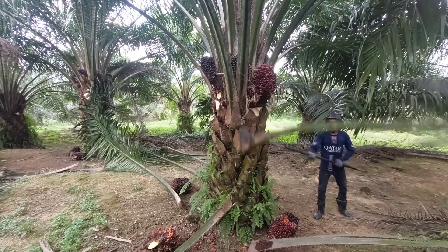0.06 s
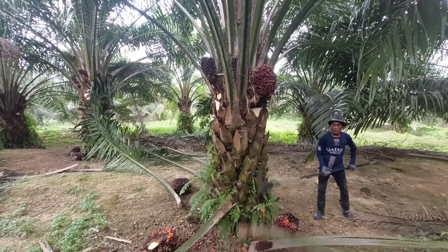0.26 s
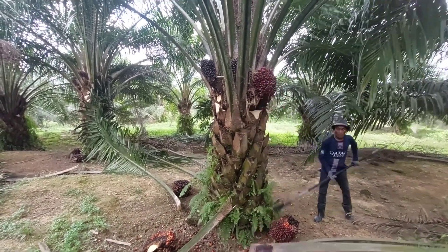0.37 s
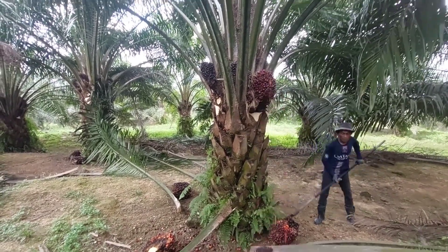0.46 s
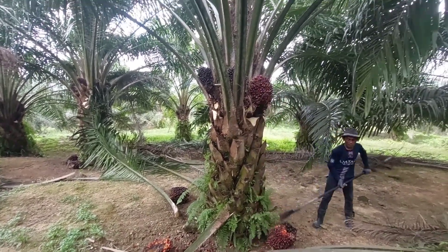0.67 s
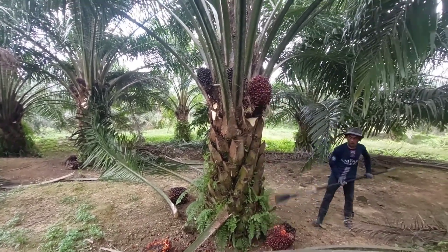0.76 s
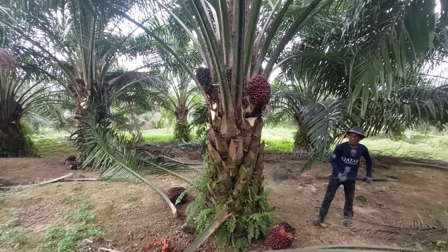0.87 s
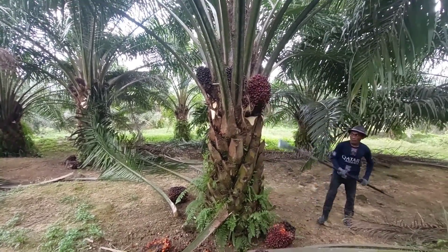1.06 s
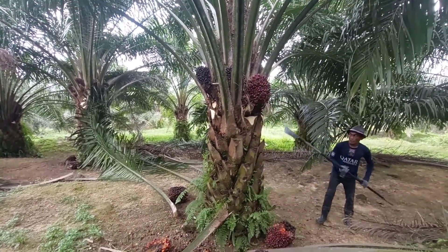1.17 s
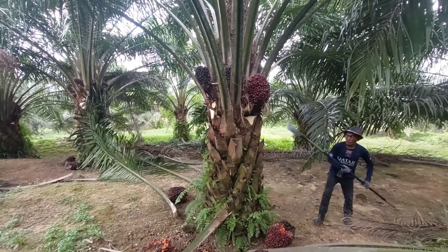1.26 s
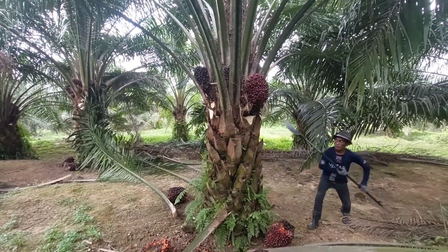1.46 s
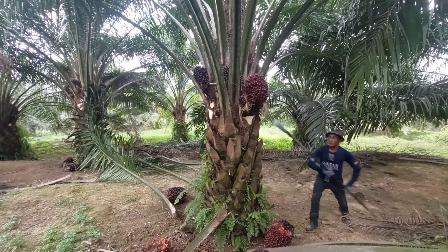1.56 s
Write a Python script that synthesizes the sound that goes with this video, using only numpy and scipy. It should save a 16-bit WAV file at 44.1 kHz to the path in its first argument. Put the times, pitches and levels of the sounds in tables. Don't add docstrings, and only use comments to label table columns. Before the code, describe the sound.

A cut palm frond falls and crashes in a plantation. Leaflets swish from the start, woody knocks and a faint steel ring come at 0.23 s, then a loud, crackly impact at 0.37-0.45 s with soil scraping. Dry stalk bounces follow at 0.64-0.75 s, then tiny rustles and ticks fade, with a soft low knock near 1.57 s. A far engine hums low beneath faint air and insect hiss.

```python
import sys
import numpy as np
from scipy import signal
from scipy.fft import rfft, irfft, next_fast_len
from scipy.io import wavfile
from scipy.ndimage import map_coordinates

SR = 44100
rng = np.random.default_rng(int(sys.argv[2]) if len(sys.argv) > 2 else 0)


def transcribe(signal):
    frames = np.atleast_2d(signal).T
    limited = np.clip(frames, -1, 1)
    pcm = np.round(limited * 32767).astype(np.int16)
    wavfile.write(sys.argv[1], SR, pcm)


def gain_from_db(level_db):
    decades = np.asarray(level_db, float) / 20
    return 10 ** decades


N = 70560

# (time [s], level [dB])
RUSTLE_LEVEL = [(0, -41), (.098, -41), (.142, -46), (.3, -45), (.313, -37.5), (.36, -35.5), (.385, -26.5),
                (.393, -21), (.45, -29.5), (.508, -38), (.528, -35), (.57, -44), (.78, -53), (.94, -56),
                (.97, -59), (1.13, -62.5), (1.27, -66.5), (1.6, -70)]
# (frequency [Hz], likeness, clipped to 0 to 1)
FROND_ALIKE = [(60, 0.1), (240, -2.2), (950, 0.74), (3770, -0.12), (15000, 0.029)]
# (frequency [Hz], likeness [0 to 1])
FAR_ALIKE = [(60, 0.75), (380, 0.54), (2380, 0.16), (15000, 0.04)]
FROND_LEAD_S = 0.00019


def unit(x):
    return x / np.sqrt(np.mean(x ** 2) + 1e-20)


def along(points, hz):
    f, v = np.transpose(points)
    return np.interp(np.log(hz + 1), np.log(f + 1), v)


def closed(points):
    return [(points[0][0] / 2, -120), *points, (points[-1][0] * 2, -120)]


def curve(rows):
    return np.interp(np.arange(N) / SR, *np.transpose(rows))


def wobble(rate):
    knots = rng.standard_normal(int(N * rate / SR) + 4)
    return map_coordinates(knots, [np.arange(N) * rate / SR])


def filtered(x, response):
    m = next_fast_len(x.shape[-1] + SR // 4)
    return irfft(rfft(x, m) * response(np.fft.rfftfreq(m, 1 / SR)), m)[..., :x.shape[-1]]


def spread(pair, spectrum, alike, lead_s=0):
    # (frequency [Hz], level difference [dB])
    left_lean = [(60, 27.5), (380, 1.5), (2380, 5.5), (15000, 5.5)]

    def sides(hz):
        lean = gain_from_db(along(left_lean, hz) * np.c_[[.5, -.5]])
        return lean * np.exp(1j * np.pi * hz * lead_s * np.c_[[1, -1]])

    def shared_and_opposite(hz):
        angle = np.arccos(np.clip(along(alike, hz), 0, 1)) / 2
        return gain_from_db(along(closed(spectrum), hz)) * [np.cos(angle), np.sin(angle)]

    a, b = filtered(pair, shared_and_opposite)
    return filtered(np.array([a + b, a - b]), sides)


def engine():
    # (time [s], level [dB])
    engine_level = [(0.0, -41.5), (0.254, -39.5), (0.726, -49.5), (1.256, -51), (1.6, -49)]
    # (frequency [Hz], width [Hz], level [dB])
    pipe_modes = [(58, 15.6, 0), (138, 35, 2.5), (193, 76, -5.5), (290, 63, -24.5)]
    # (frequency [Hz], density [dB per Hz])
    rasp_color = [(500, -40), (750, -22), (950, -21), (1150, -27.5), (1500, -63)]
    # (frequency [Hz], density [dB per Hz])
    rumble_color = [(13, -36), (22, -32), (49, 3.5), (120, -6.5), (160, -23), (260, -120)]
    firing_hz, jitter, pulse_spread_db = 65, .07, 2.5
    rumble_db, rasp_db = -1.5, -14

    def pipe(f):
        total = 0
        for k, (center, width, db) in enumerate(pipe_modes):
            mode = 1j * f * width / (center * center - f * f + 1j * f * width)
            total = total + (-1) ** k * gain_from_db(db) * mode
        return total / (1 + (f / 450) ** 4)

    phase = np.cumsum(firing_hz * (1 + jitter * wobble(20))) / SR
    firing = np.diff(np.floor(phase), prepend=0) > 0
    hum = unit(filtered(firing * gain_from_db(pulse_spread_db * wobble(60.6)), pipe))
    gate = 1 + .5 * np.cos(2 * np.pi * phase)
    rasp = unit(spread(gate * rng.standard_normal((2, N)), rasp_color, FAR_ALIKE))
    low = filtered(rng.standard_normal(N), lambda f: gain_from_db(along(closed(rumble_color), f)))
    rumble = unit(gain_from_db(wobble(8.0)) * low)
    level_db = curve(engine_level)
    hum_db = (level_db + 2 * level_db[-1]) / 3 - 1.0
    return gain_from_db(hum_db) * hum + gain_from_db(level_db + rumble_db) * rumble + gain_from_db(level_db[-1] + rasp_db) * rasp


def grove_floor():
    # (frequency [Hz], density [dB per Hz])
    air_color = [(180, -38), (300, 6.5), (553, -17), (971, 3.5), (1370, -6.5), (5790, -20.5), (6840, -44),
                 (15600, -31)]
    # (frequency [Hz], density [dB per Hz])
    insect_color = [(6000, -37), (6600, -7), (7100, 0), (7500, -5), (8100, -30)]
    air_db, insect_db, fade_db_per_s = -60.5, -69, -10.5
    air = unit(spread(rng.standard_normal((2, N)), air_color, FAR_ALIKE))
    insects = unit(spread(rng.standard_normal((2, N)), insect_color, FAR_ALIKE))
    fade_db = fade_db_per_s * (np.arange(N) / SR - 1.65)
    return gain_from_db(air_db) * air + gain_from_db(insect_db + fade_db + 1.7 * wobble(30.6)) * insects


def frond():
    # (frequency [Hz], density [dB per Hz])
    leaf_color = [(120, -3), (250, 1.5), (1380, -4.5), (1880, -2), (2060, 0), (2390, -2), (9550, -7.5),
                  (12100, -7), (15600, -1.5)]
    grain_db, grain_spread_db, grain_s, flutter_db = -5, 4, .0012, .6
    sizes = gain_from_db(grain_spread_db * wobble(1 / grain_s))
    rub, tick = rng.standard_normal((2, 2, N))
    grainy = rub + gain_from_db(grain_db) * unit(sizes * tick)
    rustle = unit(spread(grainy, leaf_color, FROND_ALIKE, FROND_LEAD_S))
    flutter = flutter_db * (wobble(25.4) + wobble(69.9))
    return gain_from_db(curve(RUSTLE_LEVEL) + 5.5 + flutter) * rustle


def slaps():
    # (time [s], level [dB rms], center [Hz], 60 dB decay [s], width [octaves])
    slap_list = [(.09, -50, 9000, .05, .5), (.157, -38, 2470, 0.14, 0.76), (.367, -20, 9000, 0.026, .5),
                 (.319, -37, 2380, 0.033, 0.58), (.373, -36, 5200, .02, .3),
                 (0.3729, -33, 1700, 0.041, 0.68), (.387, -17, 5550, 0.018, 1),
                 (0.3924, -6, 6460, 0.0099, 0.95), (.3985, -21, 5100, 0.028, 0.19),
                 (.401, -21, 2500, .03, .5), (.431, -26, 1900, .03, .4), (.442, -18.5, 4700, .014, .4),
                 (.448, -29, 5000, .04, .3), (.522, -43, 6000, 0.13, .6), (.645, -39.5, 3160, 0.062, 0.54),
                 (0.7003, -36, 4070, .018, 0.3), (.799, -44, 4800, 0.024, 0.17),
                 (.806, -40, 11500, .016, .5), (.841, -38, 9000, .025, 1.1), (.845, -45, 11500, .11, .5),
                 (.848, -48, 5500, .09, .5), (1.02, -55, 9000, .04, .8), (1.045, -54, 10000, .16, .6),
                 (1.056, -47, 2000, .02, 1.3), (1.095, -56, 4600, .16, .25), (1.248, -62, 12000, .02, .6),
                 (1.325, -60, 11000, 0.055, 0.45), (1.38, -60, 11500, .05, .5), (1.43, -61, 12200, .05, .5)]
    out, t = np.zeros((2, N + SR)), np.arange(SR // 5) / SR
    for s, db, hz, t60, octaves in slap_list:
        band = [(hz / 2 ** (3 * octaves), -30), (hz / 2 ** octaves, -6), (hz, 0),
                (hz * 2 ** octaves, -6), (hz * 2 ** (2 * octaves), -20)]
        puff = unit(spread(rng.standard_normal((2, len(t))), band, FROND_ALIKE, FROND_LEAD_S))
        onset = 1 - np.exp(-t / 0.00023)
        out[:, round(s * SR):][:, :len(t)] += gain_from_db(db - 60 * t / t60) * onset * puff
    return out[:, :N]


def knocks():
    # (time [s], peak [dB], pitch [Hz], 60 dB
    # decay [s], left over right [dB])
    stalk_knocks = [(0.158, -38, 357, 0.071, 1), (0.16, -36, 268, 0.061, 8), (0.225, -26, 1810, 0.036, 6),
                    (.2275, -29, 2440, 0.024, 5), (0.228, -27, 1132, 0.026, -3),
                    (0.2305, -26, 1440, 0.019, 7.5), (.2305, -22, 560, 0.025, 2),
                    (0.2309, -20.5, 388, 0.04, -4), (.236, -30.5, 329, 0.075, -1),
                    (0.3728, -22, 1200, 0.045, 3), (.373, -25.5, 297, 0.044, 0),
                    (0.388, -10.5, 1547, 0.024, 3.5), (.391, -17.5, 961, 0.031, 0),
                    (.402, -25, 818, 0.047, 2), (.3718, -13.5, 2200, .026, 1), (.3903, -9, 430, .055, 3),
                    (.3922, -16.5, 298, .08, -3), (.394, -16, 205, .04, 0), (0.413, -22.5, 294, 0.036, 14),
                    (.415, -24, 453, 0.028, 3), (.426, -28.5, 514, .03, 0), (.441, -25.5, 335, 0.027, -3),
                    (0.529, -31, 1470, 0.02, 13.5), (.538, -44, 2190, 0.028, 8.5),
                    (.642, -23.5, 1052, 0.027, 0), (.6455, -25.5, 1153, 0.02, 8.5),
                     (0.675, -36, 1390, 0.027, 6), (0.7, -28.5, 1040, 0.021, 0),
                     (0.702, -32.5, 837, 0.029, 2), (0.707, -35.5, 392, 0.018, -5),
                     (0.704, -35, 1870, 0.023, 4), (.727, -45, 714, 0.018, 9),
                     (.7455, -15.5, 1130, .011, -1), (.7468, -33, 2200, .015, 1),
                     (.7505, -33, 1250, .014, 0), (.747, -40, 330, .03, 0), (.807, -48, 2800, .012, 4),
                     (.841, -46, 1960, 0.047, 6.5), (0.896, -41, 1070, 0.025, -3.5),
                     (.897, -45, 2110, .02, 1), (0.938, -43, 1540, 0.027, 4), (.985, -45, 2300, .015, 2),
                     (1.005, -48.5, 884, 0.06, -3), (1.011, -49, 1500, 0.016, 2),
                     (1.054, -41, 745, 0.019, 4), (1.055, -42, 344, 0.016, 8), (1.056, -41, 1690, .012, 0),
                     (1.556, -47, 316.4, 0.076, 0), (1.567, -34.5, 290, 0.027, -5)]
    # (frequency over pitch [ratio], level [dB])
    wood_modes = [(.55, -26), (.8, -14), (1, 0), (1.2, -14), (1.42, -16), (1.95, -18), (3.6, -28)]
    rise_s, crunch_db, crunch_over_pitch, lead_s_per_db = .0013, -16, 2.2, .00005
    out, time = np.zeros((2, N + SR)), np.arange(SR // 4) / SR
    for s, db, hz, t60, pan_db in stalk_knocks:
        delay = lead_s_per_db * np.clip(pan_db * np.c_[[-1, 1]], 0, None)
        t = np.clip(time - delay, 0, None)
        ring = 0
        for ratio, level in wood_modes:
            decay = gain_from_db(level - 60 * t / t60 * ratio ** .5)
            ring = ring + decay * np.sin(2 * np.pi * hz * ratio * t)
        b, a = signal.butter(2, crunch_over_pitch * hz, fs=SR)
        fibers = unit(signal.lfilter(b, a, rng.standard_normal(t.shape)))
        crunch = gain_from_db(crunch_db - 60 * t / t60) * fibers
        swell = 1 - np.exp(-(t / rise_s) ** 2)
        gain = gain_from_db(db + 3.0 + pan_db * np.c_[[.5, -.5]])
        out[:, round(s * SR):][:, :len(time)] += gain * swell * (ring + crunch)
    return out[:, :N]


def chisel():
    # (time [s], level [dB])
    touches = [
        (.2265, 0),
        (.3225, -6),
    ]
    # (frequency [Hz], level [dB], 60 dB decay [s])
    steel_modes = [(4797, -38, .33), (4822, -41, .35), (3257, -49, .5), (3280, -52, .4), (6659, -56, .2)]
    ring = 0
    for s, tap_db in touches:
        t = np.clip(np.arange(N) / SR - s, 0, None)
        onset = 1 - np.exp(-t / 0.0016)
        for hz, db, t60 in steel_modes:
            ring = ring + gain_from_db(tap_db + db - 60 * t / t60) * np.sin(2 * np.pi * hz * t) * onset
    return ring


def grove(x):
    # (frequency [Hz], 60 dB decay [s])
    grove_decay = [(200, 0.12), (1000, 0.11), (3000, 0.12), (10000, 0.056)]
    hz, t, z = signal.stft(rng.standard_normal((2, SR // 2)), SR, nperseg=256)
    fading = z * gain_from_db(-60 * t / along(grove_decay, hz)[:, None])
    tail = signal.istft(fading, SR, nperseg=256)[1]
    tail = tail / np.linalg.norm(tail[0])
    late = np.pad(x, (200, 0))[None]
    echo = signal.fftconvolve(late, tail, axes=1)[:, :N]
    return echo[0] + filtered(echo - echo[0], lambda f: 1 / (1 + (700 / (f + 1)) ** 2))


def litter():
    # (frequency [Hz], density [dB per Hz])
    soil_color = [(170, 6.5), (300, 9), (500, 1.5), (1000, -13), (1600, -5.5), (2500, -10)]
    scrape_db, grows, lump_db = -35.5, 0.84, 2.5
    landed = np.clip((np.arange(N) / SR - .385) / .01, 0, 1)
    lumpy = gain_from_db(lump_db * wobble(60.1)) * rng.standard_normal((2, N))
    scrape = unit(spread(lumpy, soil_color, FROND_ALIKE, FROND_LEAD_S))
    return landed * gain_from_db(scrape_db + grows * (curve(RUSTLE_LEVEL) + 28.5)) * scrape


def scene():
    background = engine() + grove_floor()
    leaves = frond() + slaps()
    hits = knocks() + chisel()
    echo = gain_from_db(-18) * grove(hits.mean(0))
    return background + leaves + hits + echo + litter()


def low_pass(x):
    return signal.sosfilt(signal.butter(12, 15780, fs=SR, output="sos"), x)


def record(dry):
    # (frequency [Hz], gain [dB])
    mic_color = [(2500, 1), (3600, -1), (5000, 2.5), (7000, 1), (8800, -2.5), (11500, 3), (14000, -5),
                 (15800, -13.5)]
    mono_below_hz, low_cut_hz, ceiling, top_hz = 720, 42, .9, 15780

    def color(hz):
        low_cut = (1j * hz / (low_cut_hz + 1j * hz)) ** 2
        return gain_from_db(along(mic_color, hz)) * low_cut

    mid, side = (dry[0] + dry[1]) / 2, (dry[0] - dry[1]) / 2
    side = filtered(side, lambda hz: 1 - .75 / (1 + (hz / mono_below_hz) ** 4))
    x = filtered(np.array([mid + side, mid - side]), color)
    x = x / (1 + np.abs(x / ceiling) ** 6) ** (1 / 6)
    mix = filtered(x, lambda hz: hz < top_hz)
    return low_pass(mix)


dry = scene()
out = record(dry)
transcribe(out)
```